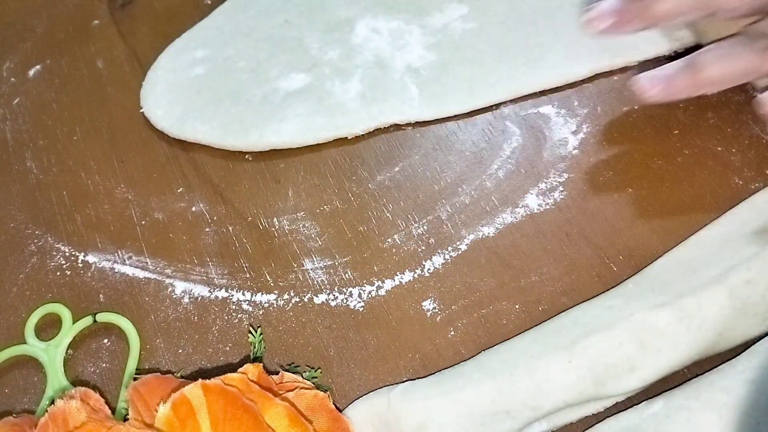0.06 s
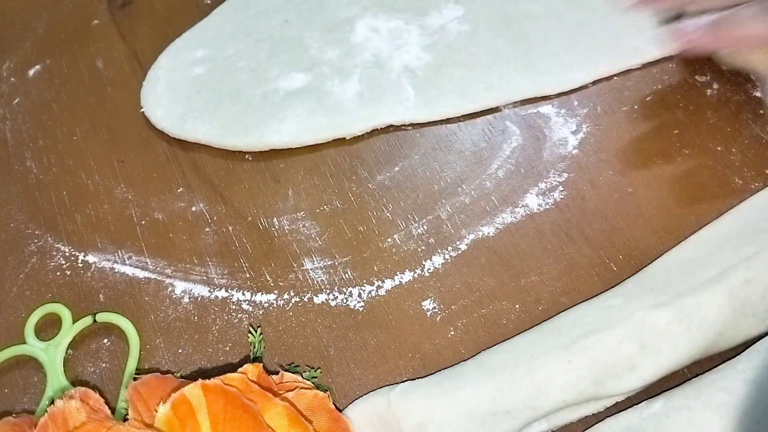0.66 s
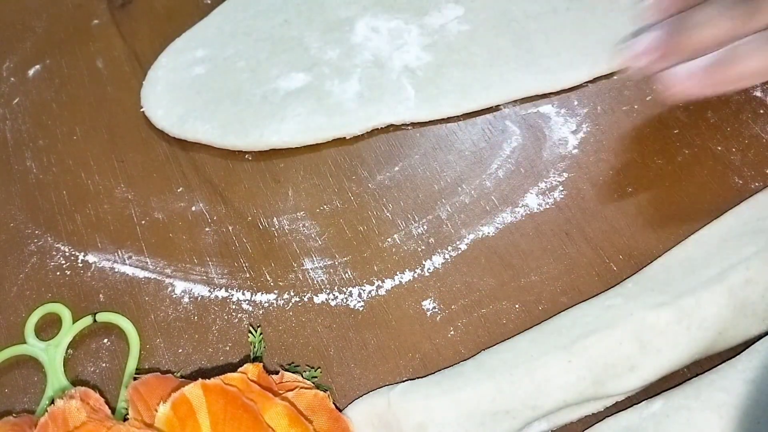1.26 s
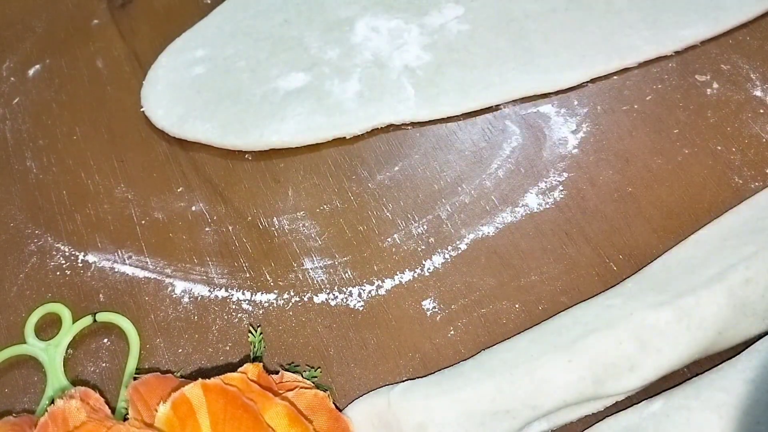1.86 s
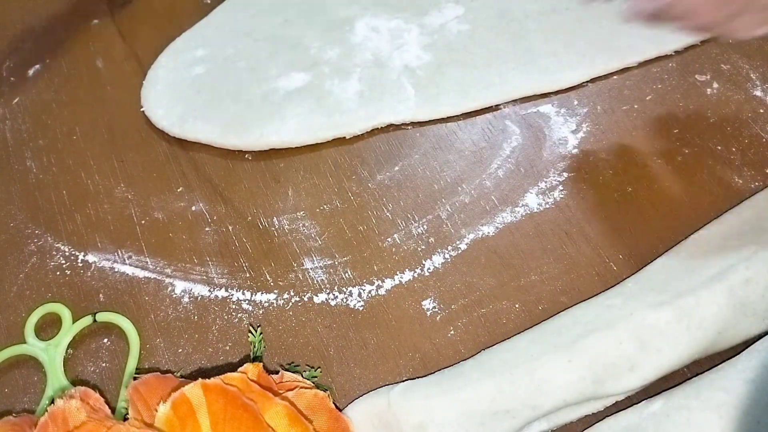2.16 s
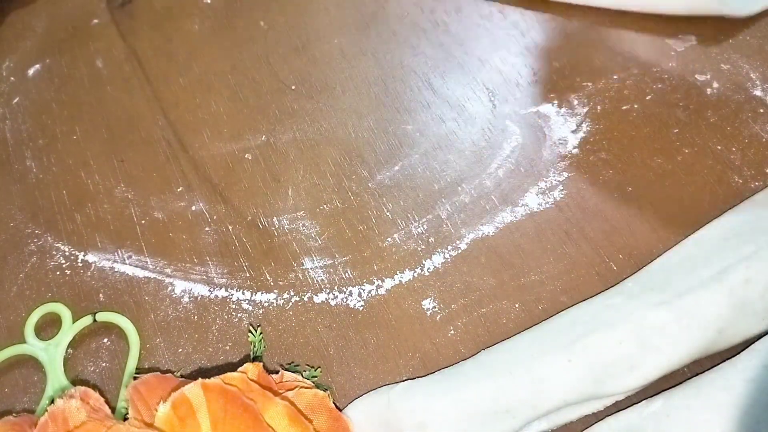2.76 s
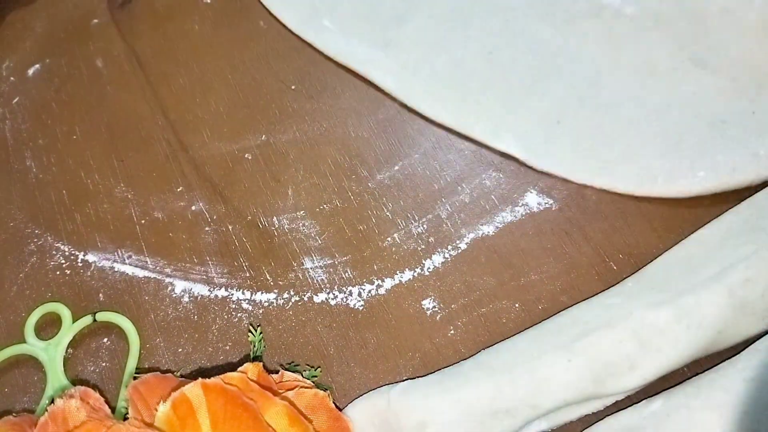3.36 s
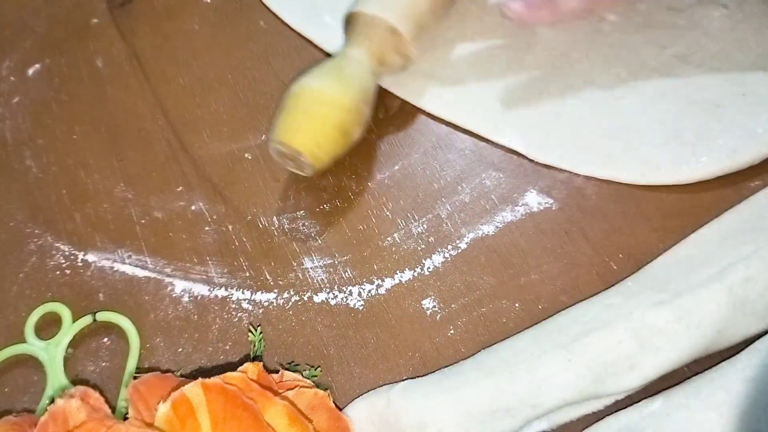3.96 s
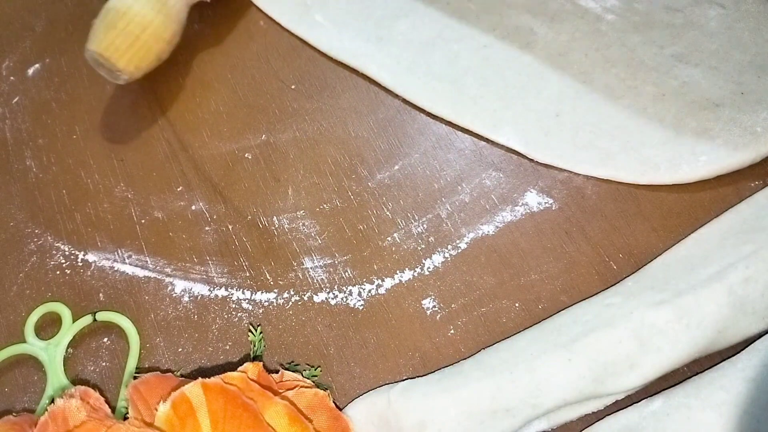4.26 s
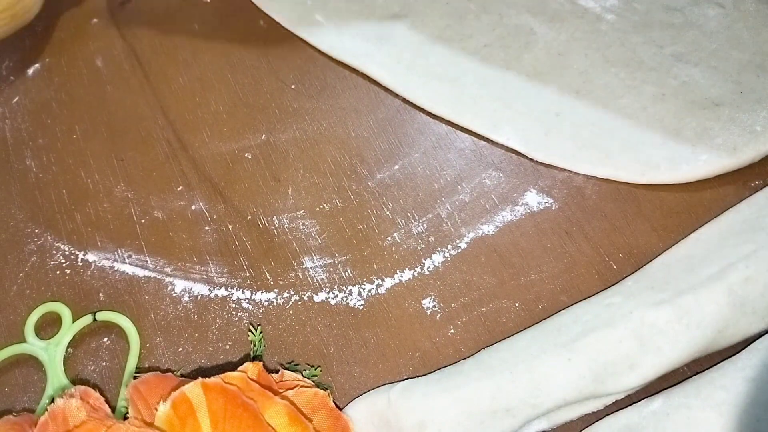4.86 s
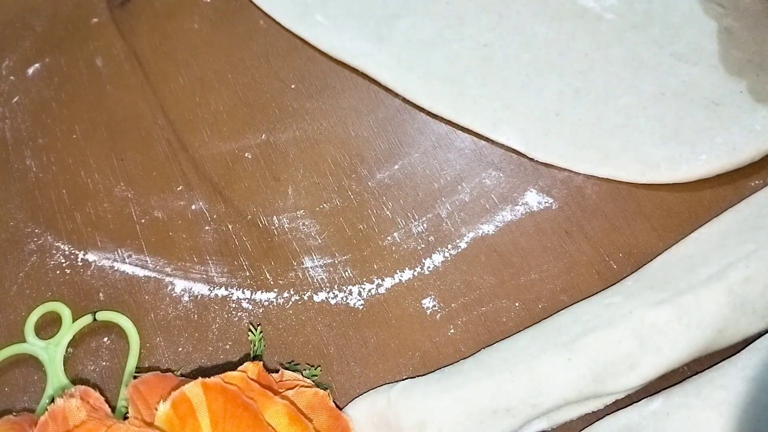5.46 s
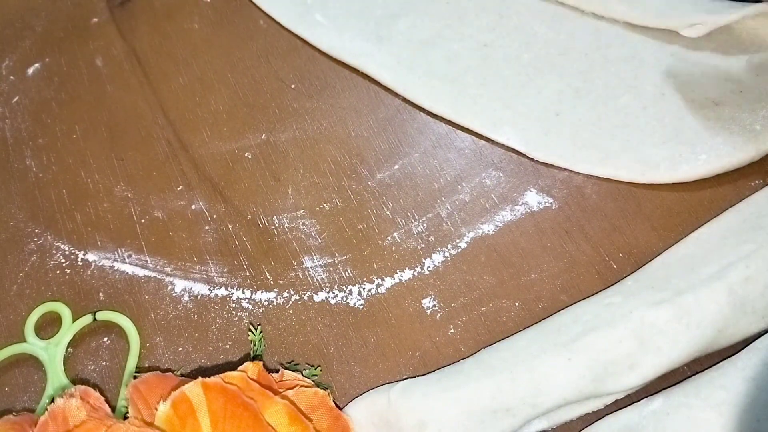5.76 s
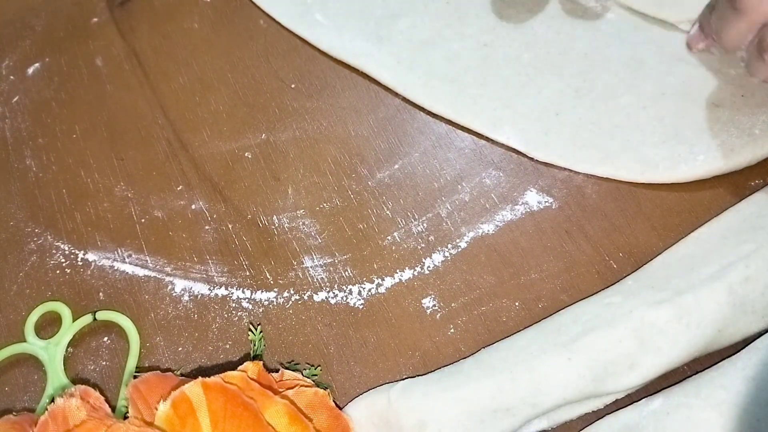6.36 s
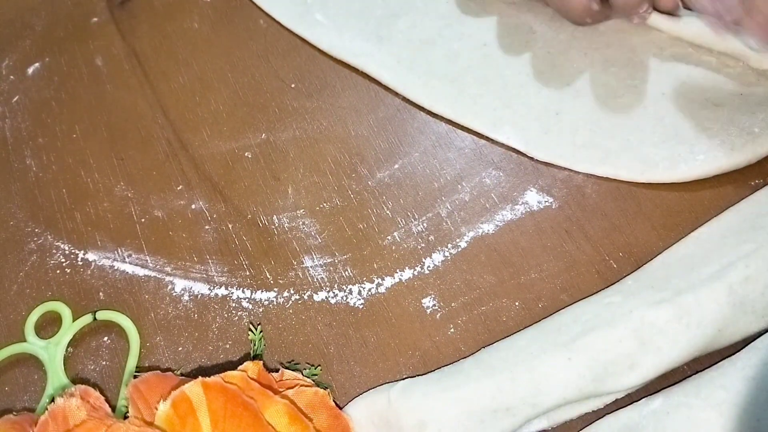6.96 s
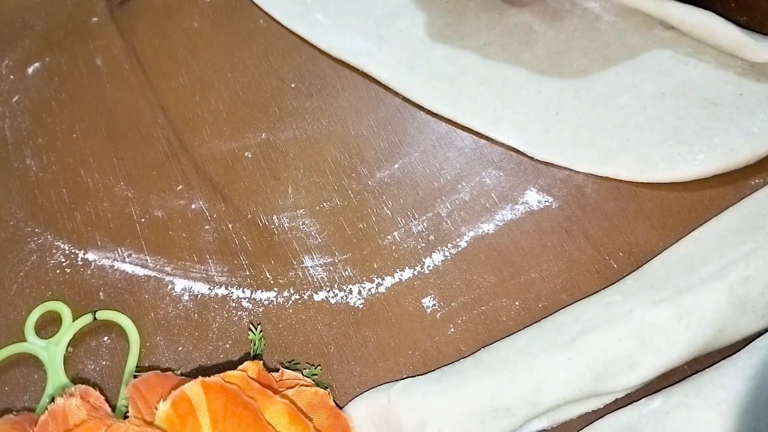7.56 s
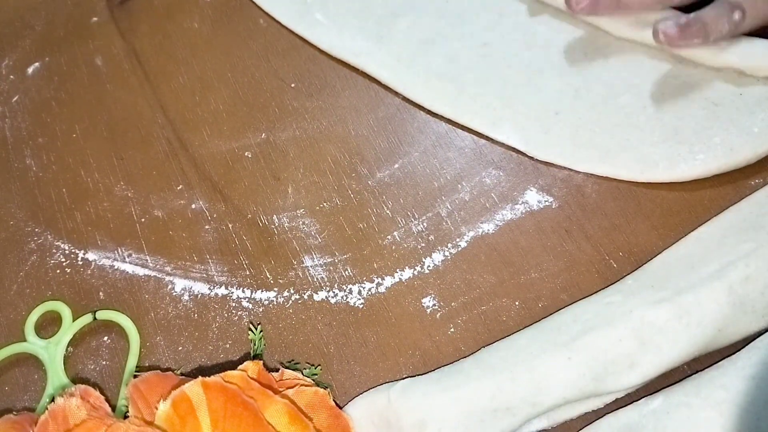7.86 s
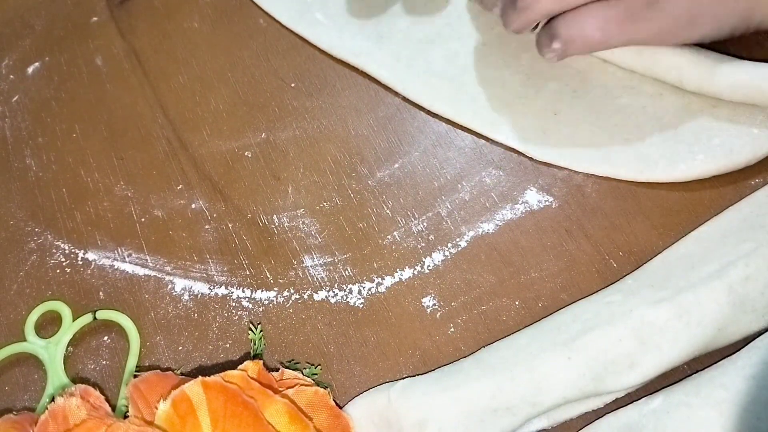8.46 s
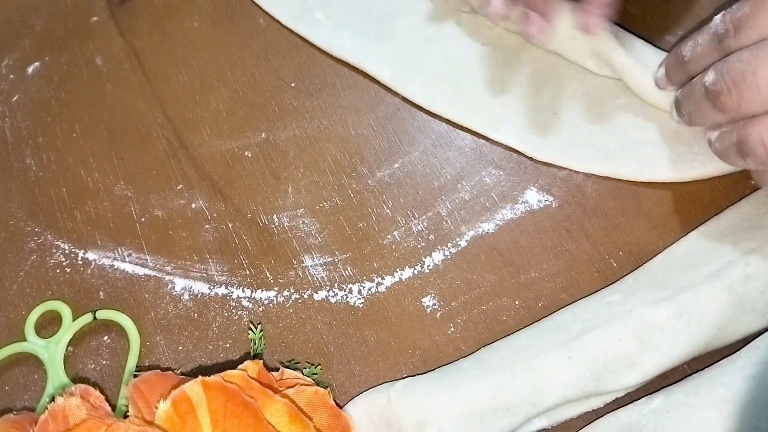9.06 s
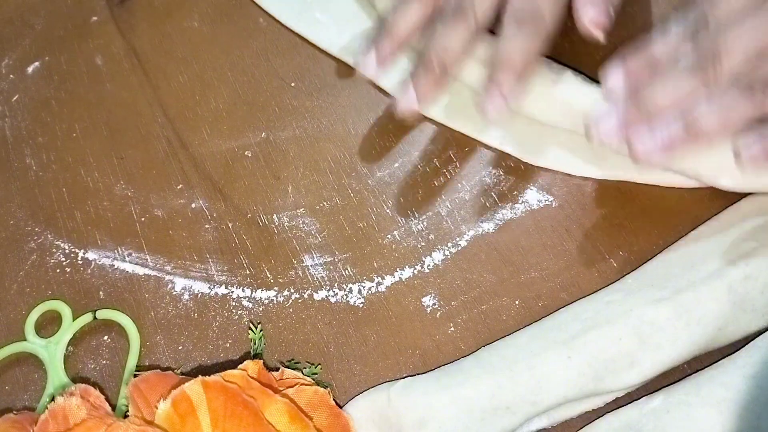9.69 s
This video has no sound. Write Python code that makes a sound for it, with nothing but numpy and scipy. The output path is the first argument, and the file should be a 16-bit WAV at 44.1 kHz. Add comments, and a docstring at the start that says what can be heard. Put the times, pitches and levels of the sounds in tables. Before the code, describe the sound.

A wooden rolling pin softly rolls, knocks and clatters on a floured table, then hands faintly brush and roll up dough.

```python
"""A quiet kitchen, close to a floured wooden table where dough is worked.
A wooden rolling pin hisses over the flour, rings faintly from friction and bumps the table;
it is put down with a clatter. The sheet is flipped, slaps down and is rolled again;
then hands brush over it and roll it up. Each knock rings the table's modes; a soft hum lies behind."""
import sys
import numpy as np
from scipy import signal
from scipy.fft import rfft, irfft, next_fast_len
from scipy.io import wavfile

SR = 44100
rng = np.random.default_rng(int(sys.argv[2]) if len(sys.argv) > 2 else 0)


def unload_audio(sound):
    """Save the sound as a 16-bit wav file, at the path given as the first command line argument."""
    columns = np.transpose(np.atleast_2d(sound))
    # keep every value between -1 and 1, then stretch to whole-number steps
    steps = np.round(np.clip(columns, -1, 1) * 32767)
    wavfile.write(sys.argv[1], SR, steps.astype(np.int16))


N = 429093
TIME = np.arange(N) / SR


# Blows of pin and hands. Each row: time in seconds, peak in dB, contact pitch in Hz (hard is high),
# rebound delay in seconds, scuff level in dB.
TABLE_BLOWS = [(0.183, -47, 308, .012, -56.5), (0.364, -54, 169, .02, -70), (0.760, -33, 192, 0.036, -52),
               (1.312, -31.5, 187, 0.029, -48.5), (1.496, -53.5, 248, .012, -63),
               (2.5145, -20, 590, 0.0019, -40), (2.516, -14, 460, .0187, -44), (2.519, -25, 174, .03, -51),
               (2.595, -38, 196, 0.014, -53), (3.111, -44.5, 110, 0.0096, -66),
               (3.338, -44, 144, .021, -48), (3.465, -42.5, 131, 0.069, -62),
               (3.659, -29.5, 263, 0.024, -50), (3.94, -21.5, 174, .017, -63),
               (4.004, -40.5, 206, .02, -72), (4.448, -45, 174, .015, -81), (4.99, -25, 300, 0.014, -44),
               (4.995, -28.5, 217, .008, -49), (5.167, -37, 218, 0.032, -57),
               (5.396, -44.5, 220, 0.0084, -60), (5.715, -60, 273, 0.0093, -76),
               (6.053, -50, 245, 0.012, -69), (6.386, -45.5, 760, 0.0091, -64),
               (6.874, -50, 467, 0.0061, -74), (7.841, -49, 173, .025, -67.5), (8.382, -53, 273, .01, -84),
               (8.62, -46.5, 256, 0.017, -68), (8.724, -50.5, 700, .006, -66)]
# Runs of contacts. Each row: start in seconds, first gap in seconds, peak in dB, pitch in Hz.
CLATTER_RUNS = [(2.458, .0052, -19.5, 544), (3.667, .0066, -34.5, 452), (4.967, .0062, -30.5, 266)]
def contacts(rebound_db=-10, count=6, gap_ratio=1.12, arch_db=5.5, jitter_s=0.0011, spread_octaves=0.22):
    """Blows rebound once; clatters swell, fade and slow. Returns (s, dB, Hz) per contact."""
    out = []
    for s, db, hz, rebound_s, _ in TABLE_BLOWS:
        out += [(s, db, hz), (s + rebound_s, db + rebound_db, hz)]
    for s, gap_s, db, hz in CLATTER_RUNS:
        for k, (late, sharp) in enumerate(rng.uniform(-1, 1, (count, 2))):
            drop_db = arch_db * (2 * k / (count - 1) - 1) ** 2
            out.append((s + jitter_s * late, db - drop_db, hz * 2 ** (spread_octaves * sharp)))
            s += gap_s * gap_ratio ** k
    return out


# Modes of table and pin after a blow. Each row: frequency in Hz, relative gain in dB, T60 in seconds.
KNOCK_MODES = [(80.5, -10, 0.22), (165.9, 0, 0.035), (216.3, 3, 0.17), (246, -6.5, 0.78), (293.6, 4, 0.23),
               (328, -3, 0.79), (406, 0.5, 0.11), (604, -10, 0.39), (606, 4.5, 0.11), (736, -0.5, 0.16),
               (734, 0.5, 0.078), (840, 8, 0.26), (920, -34, 0.14)]
def knocks(ring_db=3, crack_decay_s=0.015):
    """Each blow bends the table and rings its modes; soft ones swell slowly, hard ones crack more."""
    push, crack, t = np.zeros(N), np.zeros(N), TIME[:SR // 8]
    for s, db, hz in contacts():
        hardness = hz / 500
        rise_s = 0.0014 / hardness ** 1.125
        pulse = (t / rise_s * np.exp(1 - t / rise_s)) ** 3
        add(push, s - rise_s, from_db(db) * pulse * np.cos(2 * np.pi * hz * (t - rise_s)))
        burst = np.exp(-t / crack_decay_s) * rng.standard_normal(len(t))
        add(crack, s - rise_s / 2, from_db(db - 35) * hardness * burst)
    body = sum(from_db(db + ring_db) * resonance(push, hz, np.log(1000) / np.pi / t60_s)
               for hz, db, t60_s in KNOCK_MODES)
    snap = 2 * resonance(crack, hz=1700, width_hz=560)
    pin_ping = resonance(crack, hz=4140, width_hz=120)
    return push + body + signal.sosfilt(signal.butter(2, 4500, fs=SR, output="sos"), snap + pin_ping)


# Pin strokes. Each row: start in seconds, length in seconds, then relative levels in dB of
# the flour hiss and of the pin's low, middle and high mode groups.
PIN_STROKES = [(0.0, 0.26, -70.5, -81.5, -82, -83), (0.30, .18, -72.5, -84, -89, -84.5),
               (0.608, 0.16, -67, -80, -86, -81), (0.859, 0.023, -69.5, -73, -80, -78),
               (1.008, 0.27, -73, -82.5, -92, -84), (1.30, 0.13, -73, -83, -90, -93),
               (1.489, .28, -70, -80, -90, -88), (1.798, 0.0534, -69, -68.5, -72, -71),
               (1.92, 0.048, -70.5, -71.5, -80, -80), (2.07, 0.65, -72.5, -86, -87, -82.5),
               (3.94, 0.025, -72, -71, -81, -72.5), (3.994, 0.017, -80, -62.5, -65, -69),
               (4.07, 0.191, -70.5, -68.5, -80, -86), (4.259, 0.061, -75.5, -66.5, -71, -96),
               (4.38, 0.0091, -66, -86, -87, -90), (4.469, .13, -73.5, -66.5, -71, -81),
               (4.628, 0.1445, -66.5, -72.5, -77.5, -82), (4.79, 0.032, -78, -70.5, -72.5, -82),
               (4.908, 0.15, -72, -77.5, -80, -82), (5.068, 0.12, -73.5, -72.5, -77.5, -79)]
def stroke_gain(column):
    """Gain over time of the pin's strokes, from one level column."""
    strokes = [(row[0], row[1], row[column]) for row in PIN_STROKES]
    return movement_gain(strokes, attack_s=0.038, release_s=0.053, arch_db=0)


# Flour spectrum. Each row: frequency in Hz, relative density in dB.
FLOUR_SPECTRUM = [(500, 18), (1100, 20), (1600, 7.5), (2800, 5.5), (4300, 4), (6500, 3.5), (10000, 5),
                  (11300, 1), (12000, 0), (15500, -1.5)]
def flour_hiss(gain_db=1.5):
    """Flour is crushed and dragged under the turning pin."""
    crushing = grains(per_s=16000, spread_db=1.5, flicker_db=1)
    pressure = stroke_gain(column=2)
    return pressure * from_db(gain_db + drift(23)) * coloured(crushing, FLOUR_SPECTRUM)


# Pin modes in three groups, low to high. Each row: frequency in Hz, width in Hz, relative gain in dB.
PIN_MODE_GROUPS = [
    [(1085, 13, -1.5), (1265, 40, -16), (1750, 16, -12), (2207, 46, 1)],
    [(3593, 64, 2), (5490, 100, -10.5), (7900, 100, -19), (9400, 530, -12.5)],
    [(4210, 52, -9), (8540, 110, -19)],
]
def pin_ring(gain_db=1, waver_db=2, flicker_db=2):
    """The friction of the turning pin sings in the wood's resonances."""
    out = np.zeros(N)
    friction = grains(per_s=6000, spread_db=3.7, flicker_db=2.7)
    for column, modes in enumerate(PIN_MODE_GROUPS, start=3):
        ring = sum(from_db(db + waver_db * drift(6.4)) * resonance(friction, hz, width_hz)
                   for hz, width_hz, db in modes)
        out += from_db(gain_db + flicker_db * drift(23)) * stroke_gain(column) * unit_rms(ring)
    return out


def pin_rumble(gain_db=8, hz=165, width_hz=190, bumps_db=6):
    """The table rumbles softly and unevenly under the rolling pin."""
    bumps = rng.standard_normal(N) * from_db(bumps_db * drift(18))
    rumble = resonance(resonance(bumps, hz, width_hz), hz, width_hz)
    return from_db(gain_db) * stroke_gain(column=2) * unit_rms(rumble)


def pin_squeal(peak_s=1.63, half_s=0.24, level_db=-73.5, hz=1255, fall_hz_per_s=430):
    """A thin, wavering tone slides down as the pin turns."""
    t = TIME - peak_s
    phase = 2 * np.pi * np.cumsum(hz - fall_hz_per_s * t) / SR
    tone = drift(50) * np.cos(phase) + drift(50) * np.sin(phase)
    return from_db(level_db) * np.exp(-(t / half_s) ** 2) * unit_rms(tone)


# Slaps and sticky ticks. Each row: start in seconds, relative level in dB, centre in Hz, decay in seconds.
DOUGH_SLAPS = [(0.693, -63, 7000, .008), (0.755, -65, 940, 0.009), (1.303, -53.5, 1700, 0.025),
               (2.454, -51.5, 3170, 0.0043), (2.511, -52, 3880, 0.011), (2.595, -60, 2240, 0.012),
               (2.767, -58.5, 4600, 0.0054), (3.325, -52, 3600, .02), (3.326, -51.5, 1150, 0.026),
               (3.463, -46.5, 1440, .0035), (3.657, -54.5, 1590, 0.021), (4.965, -48, 8900, 0.0012),
               (4.9695, -51, 9100, .00077), (4.966, -49, 1050, 0.02), (5.161, -60.5, 1100, 0.028),
               (5.376, -67.5, 870, 0.021), (5.711, -62, 1300, 0.0073), (6.052, -57, 990, 0.0099),
               (6.381, -53.5, 1100, 0.016), (6.869, -59, 1210, .0062), (6.874, -58, 7500, 0.0019),
               (6.871, -61.5, 4000, 0.0035), (8.381, -66, 5350, .015), (8.621, -46.5, 1250, 0.0042),
               (8.619, -50, 4500, 0.0018), (8.723, -50, 1150, 0.0062)]
def slaps(width_share=0.25):
    """Dough or a finger meets or leaves a surface: a burst of tiny contacts that dies away."""
    out, t = np.zeros(N), TIME[:SR // 5]
    for s, db, hz, decay_s in DOUGH_SLAPS:
        burst = unit_rms(resonance(rng.standard_normal(len(t)), hz, hz * width_share))
        add(out, s, from_db(db) * burst * np.exp(-t / decay_s))
    return signal.lfilter(*signal.butter(1, 9000, fs=SR), out)


# Padded scuffs. Each row: peak time in seconds, level in dB, centre in Hz, half length in seconds.
TABLE_SCUFFS = [(0.083, -59.5, 217, 0.027), (0.671, -54, 182, 0.035), (2.30, -54.5, 123, 0.056),
                (2.411, -53, 350, 0.02), (2.482, -31, 245, 0.023), (2.482, -46, 696, .024),
                (2.65, -53.5, 150, .08), (2.795, -54, 706, .016), (3.017, -64.5, 605, .032),
                (3.10, -56.5, 133, .085), (3.343, -49, 700, 0.023), (3.358, -48, 66.6, 0.045),
                (3.46, -51.5, 148, .11), (3.5, -53, 720, 0.017), (3.688, -50, 620, .02),
                (3.935, -37.5, 101, 0.016), (4.146, -56, 350, .02), (4.885, -52, 320, 0.023),
                (5.021, -49, 217, .055), (4.984, -52, 80, .04), (4.029, -58, 79.5, .08),
                (5.19, -57, 660, 0.039), (5.413, -50, 194, 0.032), (6.374, -58, 89, 0.067),
                (7.165, -58.5, 152, 0.021), (8.447, -62.5, 220, 0.022), (9.54, -60, 120, .12)]
def scuffs(width_share=0.78, blow_lag_s=0.005, blow_hz=480, blow_half_s=0.019):
    """Hand, pin or dough drags briefly on the table, alone or with a blow: a dull swell of friction."""
    out = np.zeros(N)
    blow_scuffs = [(s + blow_lag_s, db, blow_hz, blow_half_s) for s, *_, db in TABLE_BLOWS]
    for s, db, hz, half_s in TABLE_SCUFFS + blow_scuffs:
        t = np.arange(max(s - 3 * half_s, 0), s + 3 * half_s, 1 / SR)
        swell = np.exp(-((t - s) / half_s) ** 2)
        friction = np.resize(rng.standard_normal(SR), len(t))
        dull = resonance(resonance(friction, hz, hz * width_share), hz, hz * width_share)
        add(out, t[0], from_db(db) * unit_rms(dull) * swell)
    return out


# Spectra of skin, grit and fine dust. Each row: frequency in Hz, relative density in dB.
SKIN_SPECTRUM = [(350, 1), (650, -4.5), (850, 8.5), (1050, 0), (1250, 2), (1400, 1), (1680, 1), (1950, 3),
                 (2300, -7.5), (3200, -20)]
GRIT_SPECTRUM = [(1500, -13), (2300, -8), (2900, -7.5), (3300, -9), (4200, -6), (4800, -19.5),
                 (6000, -19.5), (7200, -24), (8500, -48), (12000, -45)]
DUST_SPECTRUM = [(5500, -6), (7500, -6.5), (9000, -5), (10700, -8), (12000, -12.5), (15500, -12.5)]
# Hand swishes. Each row: start in seconds, length in seconds, grit level in dB,
# skin and dust levels in dB relative to the grit, pitch of the hollow under the hand in Hz.
HAND_SWISHES = [(2.672, .25, -77, -8.5, 4, 4200), (2.919, 0.1, -68, 3.5, -5, 1800),
                (3.056, 0.15, -81.5, -3, 6, 4200), (3.321, 0.02, -46, -2.5, -15.5, 3900),
                (3.362, 0.14, -72, 1.5, 2.5, 3820), (3.584, 0.048, -83, -5, 5.5, 4180),
                (5.394, 0.11, -72, 6.5, -4.5, 3420), (5.92, 0.28, -83.5, 9, 4, 1000),
                (6.162, 0.05, -71.5, 5, -1, 6000), (6.225, 0.216, -79, 8.5, -5, 900),
                (6.964, .08, -85.5, 9.5, -2, 1900), (7.165, 0.058, -67, 0, -7.5, 3000),
                (7.219, 0.092, -63, -5, -3, 5550), (7.332, 0.11, -70.5, 3.5, -4.5, 3700),
                (7.598, 0.083, -76, 5.5, -6, 3620), (7.796, 0.075, -81, 3, 4, 2300),
                (7.866, 0.12, -61.5, -2, -13.5, 2500), (7.938, .12, -55, -3.5, -8.5, 1780),
                (8.127, .05, -79.5, 13.5, -2, 1350), (8.204, 0.021, -79, 3, -11, 3400),
                (8.387, 0.022, -72.5, 7.5, -2, 5400), (8.432, 0.052, -63.5, 3.5, -8.5, 4370),
                (8.722, .075, -63, -1.5, -10, 1990), (8.883, 0.1, -82.5, 8.5, -5, 1900),
                (9.117, 0.048, -66.5, 7, -7.5, 1580), (9.19, 0.034, -67.5, 5.5, -5, 3900),
                (9.468, 0.034, -67.5, 5, -5, 6200)]
SWISH_SHAPE = dict(attack_s=0.022, release_s=0.035, arch_db=1.5)
def hands():
    """Palms and dough slide on flour: a dull rub, a gritty swish and a fine hiss."""
    start_s, length_s, grit_db, skin_db, dust_db, _ = np.transpose(HAND_SWISHES)
    skin = grains(per_s=3500, spread_db=1.8, flicker_db=1.3)
    grit = grains(per_s=6000, spread_db=1.8, flicker_db=1.5)
    dust = grains(per_s=12000, spread_db=1.8, flicker_db=1.5)
    layers = [(skin, SKIN_SPECTRUM, grit_db + skin_db),
              (grit, GRIT_SPECTRUM, grit_db),
              (dust, DUST_SPECTRUM, grit_db + dust_db)]
    return sum(movement_gain(zip(start_s, length_s, db), **SWISH_SHAPE) * coloured(slips, spectrum)
               for slips, spectrum, db in layers)


def hand_hollows(gain_db=-4, width_share=0.23):
    """The air gap under the hand has a new size for every swish and lends it a hollow colour."""
    out = np.zeros(N)
    for start_s, length_s, db, _, _, hz in HAND_SWISHES:
        at_s, shape = movement(start_s, length_s, **SWISH_SHAPE)
        friction = np.resize(rng.standard_normal(SR), len(shape))
        hollow = resonance(resonance(friction, hz, hz * width_share), hz, 2 * hz * width_share)
        add(out, at_s, from_db(db + gain_db) * unit_rms(hollow) * shape)
    return out


def near_echoes(x):
    """Tabletop and arm reflect the sound; the paths change as the hands move, and so does the colour."""
    out = x.copy()
    for mean_lag_s, share in ((0.0007, 0.4), (0.0019, 0.3)):
        lag_s = mean_lag_s * (1 + 0.15 * drift(4))
        lag_samples = np.round(lag_s * SR).astype(int)
        out += share * x[np.maximum(np.arange(N) - lag_samples, 0)]
    return out * np.std(x) / np.std(out)


def wall_reverb(x, t60_s=0.25, cutoff_hz=3500, first_echo_s=0.0079):
    """Dense, dulled reflections from nearby walls."""
    t = TIME[:SR // 2]
    onset = np.clip(t / first_echo_s - 1, 0, 1)
    tail = rng.standard_normal(len(t)) * from_db(-60 * t / t60_s) * onset
    tail = signal.lfilter(*signal.butter(1, cutoff_hz, fs=SR), tail / np.sqrt(np.sum(tail ** 2)))
    return signal.fftconvolve(x, tail)[:N]


# Room air spectrum. Each row: frequency in Hz, relative density in dB.
AIR_SPECTRUM = [(25, -18), (60, -5.5), (115, -7), (160, -13), (200, -0.5), (265, -7.5), (350, -13),
                (580, -16), (700, -22), (850, -20), (1850, -29), (2150, -36), (4300, -38), (6500, -44.5),
                (15500, -46)]
def room_tone(air_db=-62, hum_db=-66.5, hum_hz=243.2):
    """Still air with a soft, unsteady hum, as of a distant fan."""
    hum = unit_rms(resonance(rng.standard_normal(N), hum_hz, width_hz=4.9))
    hum = signal.lfilter(*signal.butter(2, 2 * hum_hz, fs=SR), hum)
    air = coloured(rng.standard_normal(N), AIR_SPECTRUM)
    return from_db(air_db) * air + from_db(hum_db) * hum


def movement(start_s, length_s, attack_s, release_s, arch_db):
    """A slide picks up, arches by arch_db halfway and runs out. Returns onset in seconds and envelope."""
    t = np.arange(max(start_s - attack_s, 0), start_s + length_s + 4 * release_s, 1 / SR)
    rise = np.sin(np.pi / 2 * np.clip((t - start_s + attack_s) / (2 * attack_s), 0, 1)) ** 2
    arch = from_db(arch_db * (np.sin(np.pi * np.clip((t - start_s) / length_s, 0, 1)) - 0.5))
    release = np.exp(-2 * np.maximum(t - start_s - length_s, 0) / release_s)
    return t[0], rise * arch * release


def movement_gain(movements, attack_s, release_s, arch_db):
    """Gain over time of a series of slides, summed in power."""
    power = np.zeros(N)
    for start_s, length_s, db in movements:
        at_s, shape = movement(start_s, length_s, attack_s, release_s, arch_db)
        add(power, at_s, (from_db(db) * shape) ** 2)
    return np.sqrt(power)


def grains(per_s, spread_db, flicker_db):
    """Friction as many tiny slips of uneven size that come in clumps."""
    slips = (rng.random(N) < per_s / SR) * rng.standard_normal(N)
    size_db = spread_db * np.clip(rng.standard_normal(N), -2, 2)
    return slips * from_db(size_db + flicker_db * drift(70))


def drift(rate_hz):
    """Random wander with a spread of about 1."""
    steps = rng.standard_normal(4000)
    return np.interp(TIME * rate_hz, np.arange(len(steps)), steps)


def resonance(x, hz, width_hz):
    """Two-pole resonance with unit peak gain."""
    r = np.exp(-np.pi * width_hz / SR)
    zeros = np.array([1, 0, -1]) * (1 - r * r) / 2
    poles = [1, -2 * r * np.cos(2 * np.pi * hz / SR), r * r]
    return signal.lfilter(zeros, poles, x + 1e-18)


def coloured(x, spectrum):
    """Apply a spectrum that falls 20 dB per octave beyond its ends; unit rms."""
    hz, db = np.transpose(spectrum)
    size = next_fast_len(N)
    octave = np.log2(np.fft.rfftfreq(size, 1 / SR) + 1)
    beyond = np.maximum(np.log2(hz[0]) - octave, 0) + np.maximum(octave - np.log2(hz[-1]), 0)
    gain = from_db(np.interp(octave, np.log2(hz), db) - 20 * beyond)
    return unit_rms(irfft(rfft(x, size) * gain, size)[:N])


def add(track, s, sound):
    """Mix a sound into the track at s seconds."""
    at = max(int(s * SR), 0)
    track[at:at + len(sound)] += sound[:N - at]


def from_db(db):
    """Decibels to gain."""
    return 10 ** (np.asarray(db) / 20)


def unit_rms(x):
    """Scale to unit rms."""
    return x / np.sqrt(np.mean(x ** 2) + 1e-20)


def scene(knock_send_db=-15, friction_send_db=-10):
    """Everything on the table, with the room around it; mono."""
    wood = knocks()
    friction = near_echoes(slaps() + hands() + hand_hollows() + flour_hiss())
    friction += pin_ring() + pin_squeal() + pin_rumble() + scuffs()
    room = wall_reverb(from_db(knock_send_db) * wood + from_db(friction_send_db) * friction)
    return (wood + friction + room + room_tone())[None]


def record(dry):
    """Steep low-pass at 15.7 kHz."""
    return signal.sosfilt(signal.ellip(10, 0.2, 70, 15700, fs=SR, output="sos"), dry)


dry = scene()
out = record(dry)
unload_audio(out)
```